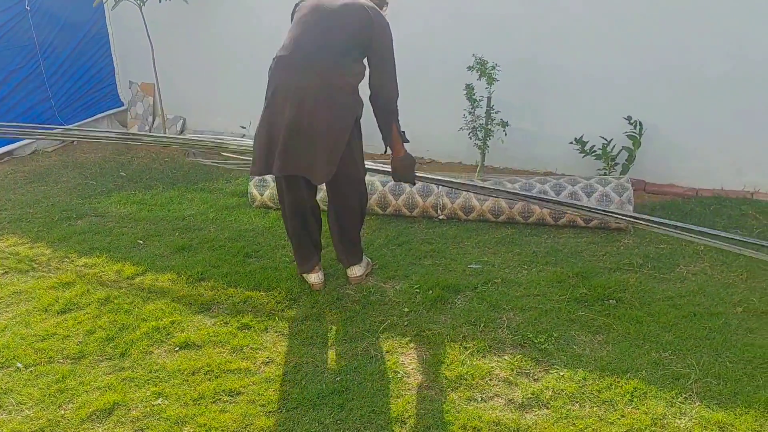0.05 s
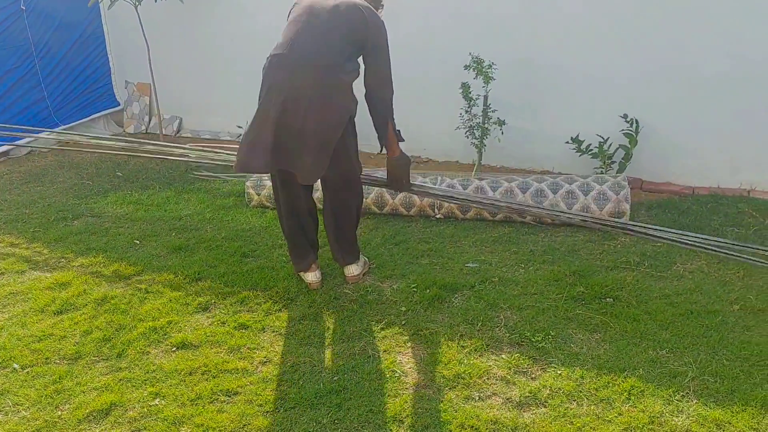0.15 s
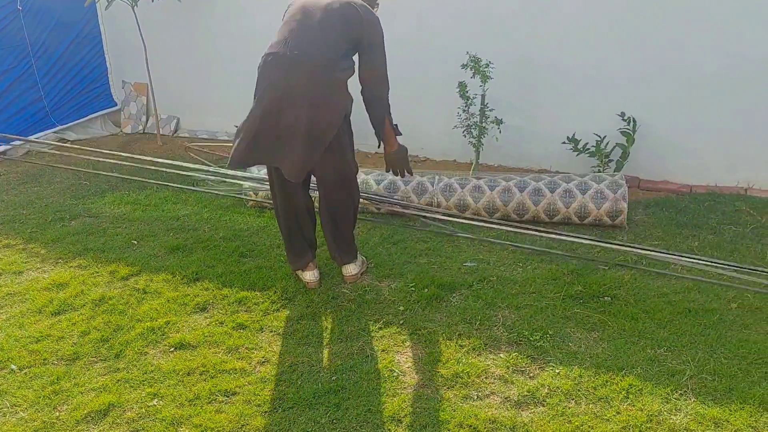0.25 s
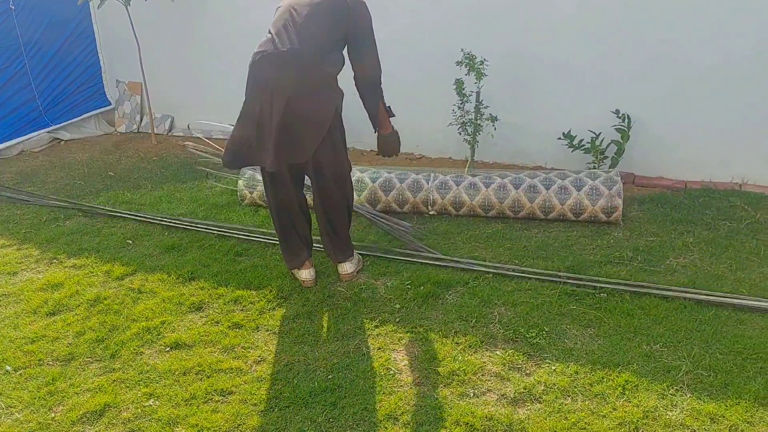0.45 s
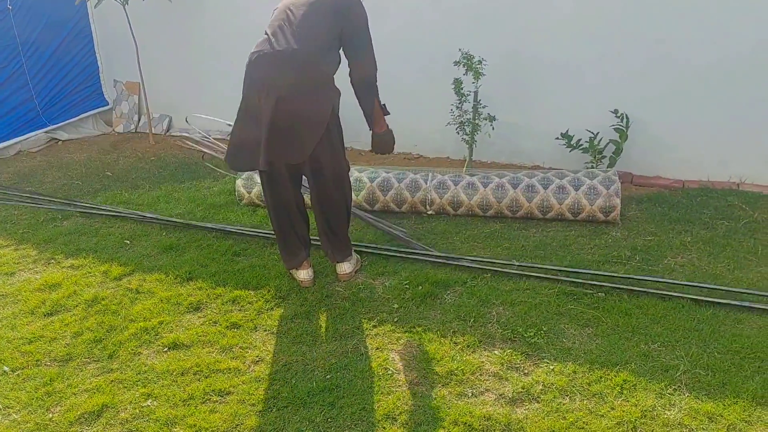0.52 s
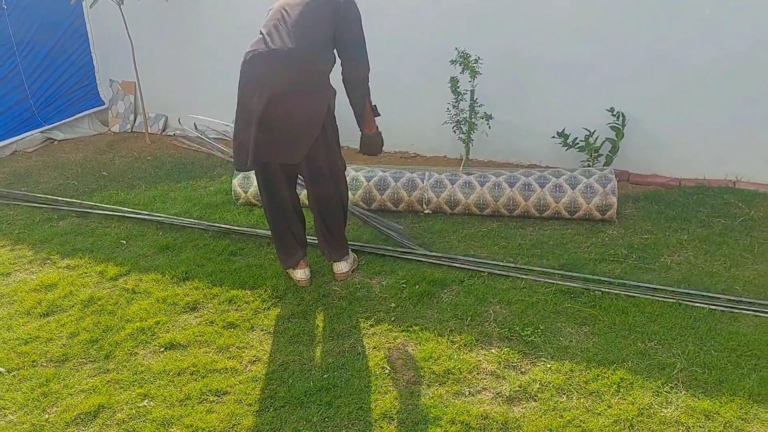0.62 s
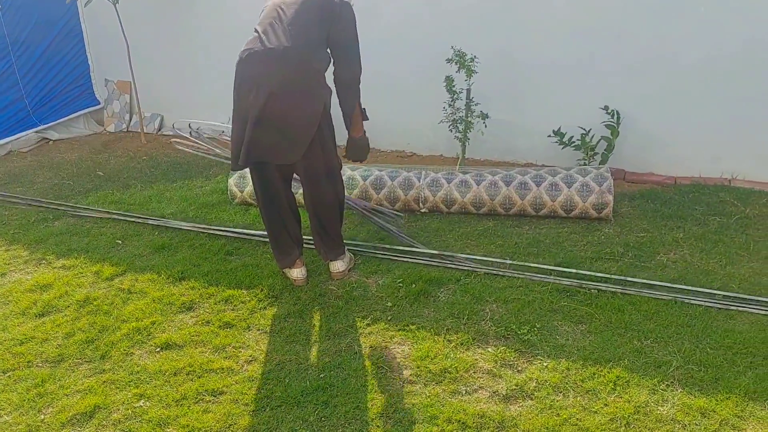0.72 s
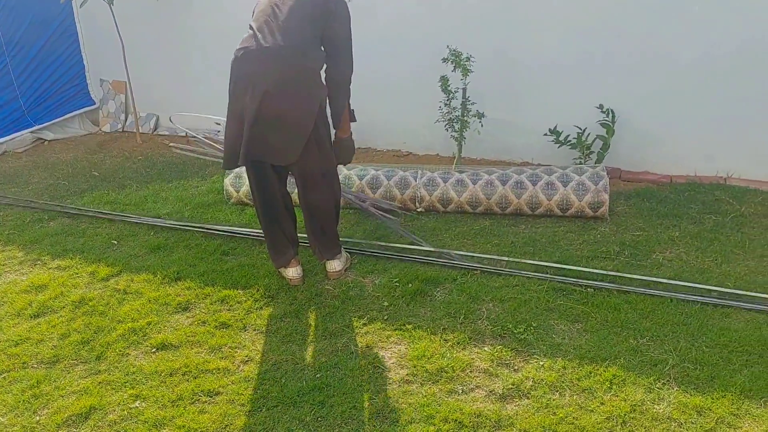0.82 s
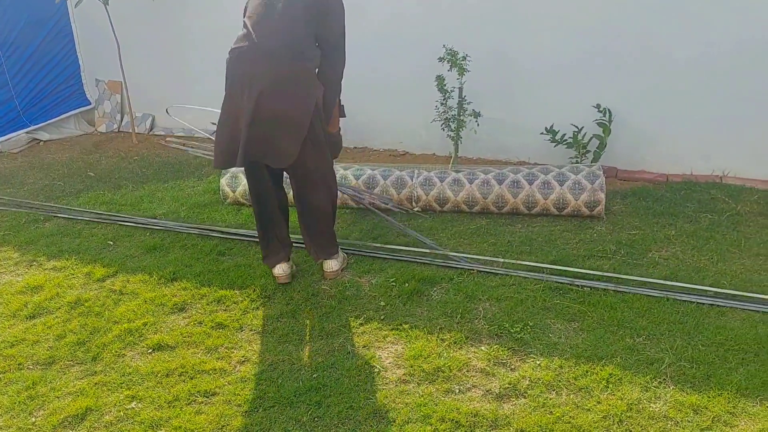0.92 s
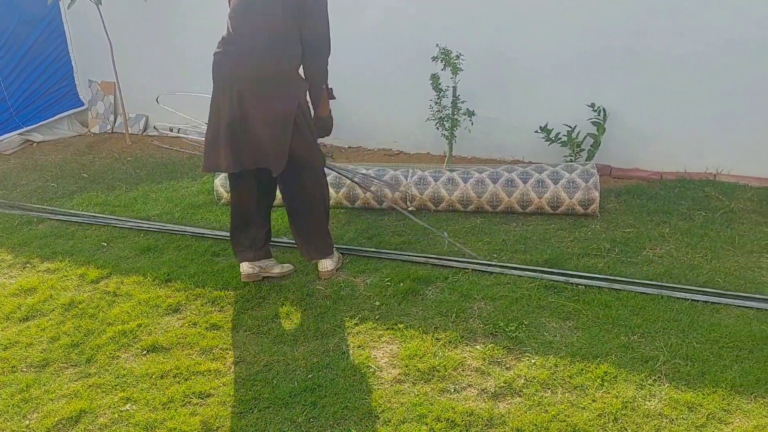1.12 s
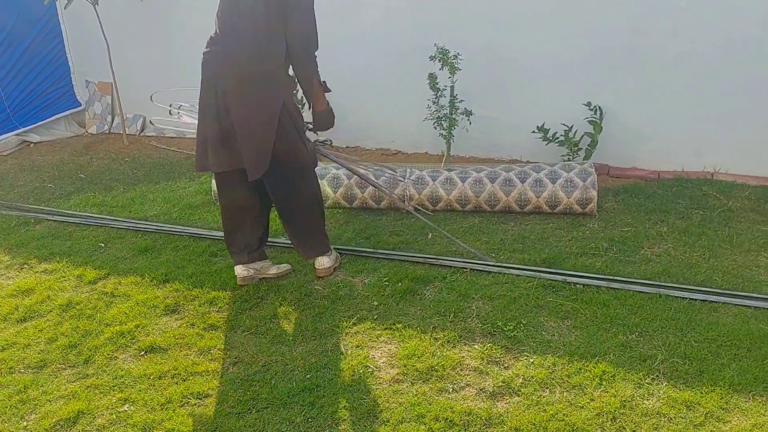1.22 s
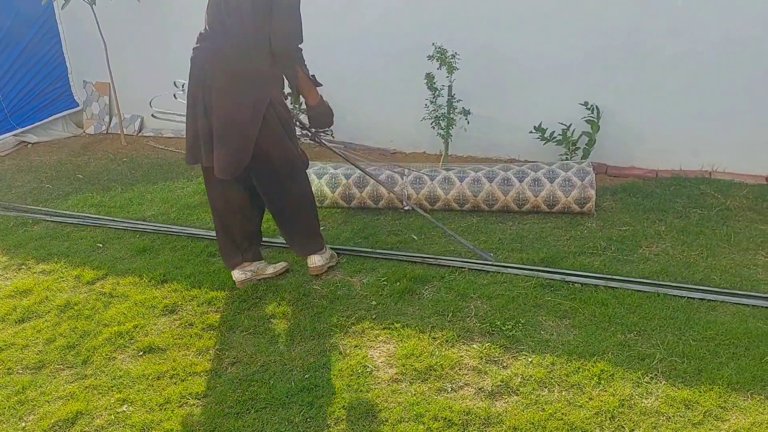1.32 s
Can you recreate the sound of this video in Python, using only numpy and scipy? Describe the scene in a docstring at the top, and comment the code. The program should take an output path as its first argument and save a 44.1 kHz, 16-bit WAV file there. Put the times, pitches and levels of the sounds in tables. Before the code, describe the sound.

A bundle of long, thin metal rods clatters and jangles as it falls, landing on a lawn with soft thuds. Dull hollow knocks and a brief sliding hiss follow as the rattle dies, over faint outdoor wind.

```python
"""A light metallic rattle over faint wind and a low hum: a bundle of long, thin rods is let go over a lawn. The
rods clash harder as they fall; every contact ticks, clanks, jangles and feeds their dense bending modes. They
land with soft thuds, a puff of wind bumps the left side, and dull hollow knocks follow. A rod slides with a
bright hiss during the fall, and over the pile near the end. The tube walls ring on in a dense, diffuse tail."""
import sys
import numpy as np
from scipy import signal
from scipy.fft import rfft, irfft, next_fast_len
from scipy.io import wavfile
from scipy.ndimage import uniform_filter1d

SR = 44100
rng = np.random.default_rng(int(sys.argv[2]) if len(sys.argv) > 2 else 0)


def materialize(psi):
    """Save the field psi as 16-bit PCM at rate SR to the path in sys.argv[1].

    A 1-D psi becomes a single channel; in a 2-D psi each row is a channel.
    """
    bounded = np.clip(np.atleast_2d(psi).T, -1, 1)
    quanta = np.round(bounded * 32767).astype(np.int16)
    wavfile.write(sys.argv[1], SR, quanta)


N = 59535

# rod clashes, each starting a dying rattle: t/s, level/dB, t60/s, brightness/dB
CLASHES = [(-.04, -44.5, 0.71, -30), (.025, -42.5, .5, -3.5), (0.051, -45.5, 3.6, 8.5),
           (0.175, -33, 1.8, 6.5), (0.251, -20.5, 0.57, 7.5), (.275, -24.5, 0.19, 2), (0.356, -22, 0.33, 6),
           (0.386, -17.5, .45, 8), (.424, -27, 0.72, 16), (0.464, -28, 0.5, 20), (0.498, -21, 0.64, 9.5),
           (0.531, -20.5, 0.097, 14), (0.547, -13, 0.17, -4), (0.653, -21, 0.37, -2.5),
           (.694, -26.5, 0.36, 9), (0.743, -26.5, 0.52, 1.5), (0.856, -32.5, .2, 1.5),
           (0.904, -30, .15, -4), (.99, -46, 0.87, -6), (1.138, -41, 0.24, 5.5), (1.194, -54.5, 0.064, 15)]
# ring time of the bending modes: f/Hz, t60/s
BEND_DECAY = [(700, 0.58), (2000, 0.43), (5000, 0.23), (9000, 0.09), (15000, 0.13)]
# colours of the bending ring, the tube-wall clank and the contact tick: f/Hz, level/dB
BEND_EQ = [(150, -14), (350, -17.5), (650, -24), (900, -9), (1300, -3), (1900, -1), (2300, 0.5),
           (3200, -1.5), (4400, -2.5), (5100, -1.5), (5900, -10), (8000, -20.5), (15000, -20)]
CLANK_EQ = [(300, -38), (700, -32), (1900, -3), (3200, -6.5), (4400, 1), (5200, -3), (5900, -7.5),
            (7500, -23), (9500, -30), (15000, -12.5)]
TICK_EQ = [(500, -13.5), (3000, 4.5), (6500, 11.5), (8500, 4), (9600, -4.5), (11500, 8), (15000, 5.5)]
# jangling modes of the tube walls: f/Hz, level/dB
TUBE_MODES = [(4320, 0.5), (4560, -6), (4700, 2), (4950, 3), (5090, 6.5), (5165, 2), (5300, 1.5)]
# how alike the metal sounds left and right: f/Hz, correlation
STEREO_LIKENESS = [(300, 0.74), (700, 0.13), (1500, 0.94), (3200, 0.3), (4400, 0.52), (5200, 0.25),
                   (6500, 0.083), (15000, 0.054)]
# its balance, left over right: f/Hz, level/dB
STEREO_BALANCE = [(60, 0.5), (92, -6), (140, 6), (210, -9), (330, -1.5), (500, -2.5), (770, 1.0),
                  (1170, -2), (1790, -6.5), (2740, -4), (4190, -7), (6410, 2), (9810, 3.5), (15000, -7.5)]
# its lead on the left: f/Hz, phase/rad
STEREO_LEAD = [(300, 0), (700, 0), (1100, 3), (1800, 2), (2300, 7), (2800, 8.5), (4600, 10), (5200, 12),
               (6200, 13.5)]
# colour of the wind: f/Hz, level/dB
WIND_EQ = [(25, -21), (55, 4.5), (120, -8.5), (250, -5.5), (600, -21), (2000, -13), (6000, -28.5),
           (15000, -21)]
# partials of the hum: f/Hz, level/dB
HUM_PARTIALS = [(64.5, -56.5), (128, -63)]
# fader ride on wind and hum together: t/s, level/dB
BED_RIDE = [(0, 3.5), (.1, 5), (.17, 6), (.22, 7.5), (.3, 3.5), (.5, 0), (.66, -0.5), (1.1, -0.5),
            (1.35, -6.5)]
# colour of the lawn's rumble: f/Hz, level/dB
TURF_EQ = [(30, -2), (70, 11), (120, -1), (250, 6), (500, -9), (1000, -21), (4000, -72)]
# strokes of a sliding rod: t/s, level/dB, t60/s
SLIDES = [(.19, -31.5, 0.54), (1.112, -51.5, 0.27), (1.143, -30.5, .18), (1.19, -41, 0.082)]
# colour of their hiss: f/Hz, level/dB
SLIDE_EQ = [(1000, -22.5), (4000, -8.5), (7000, -15), (9500, -13.5), (12000, -3.5), (15000, -2.5)]
# rods landing on the lawn: t/s, level/dB, f/Hz
THUDS = [(0.309, -36, 115.6), (.362, -31, 113), (0.4, -30, 117), (.438, -28, 118), (.442, -26.5, 217),
         (0.449, -23.5, 121), (.493, -26.5, 133), (0.556, -31, 121), (.585, -30.5, 118)]
# dull hollow knocks: t/s, level/dB, hold/s, t60/s
KNOCKS = [(0.74, -33.5, 0.024, 0.085), (.792, -35.5, .13, 0.26), (0.993, -45.5, 0.034, 0.17),
          (1.203, -43.5, 0.017, 0.35)]
# modes of the hollow body, the first two beating: f/Hz, level/dB
HOLLOW_MODES = [(234.7, -3), (256.4, -3.5), (194.8, -14.5), (290, -16), (350.4, -19.5), (391, -18.5),
                (456, -20)]
# colour of its buzz: f/Hz, level/dB
BUZZ_EQ = [(100, -25), (250, 3.5), (380, -10.5), (550, -16.5), (750, -14.5), (1000, -14), (3000, -55)]

ROD_COUNT, SPOT_COUNT = 10, 2  # rods, and striking spots on each
TOP_HZ = 15550


def amp(db):
    """Decibels to gain."""
    return 10 ** (np.asarray(db) / 20)


def along(curve, hz):
    """Read a curve on a log frequency axis."""
    freqs, values = np.transpose(curve)
    return np.interp(np.log(hz + 1), np.log(freqs + 1), values)


def filtered(x, response):
    """Pass x through a complex frequency response."""
    size = next_fast_len(N + SR // 4)
    return irfft(rfft(x, size) * response(np.fft.rfftfreq(size, 1 / SR)), size)[..., :N]


def coloured(x, eq):
    """EQ that keeps the power of white noise."""
    def response(hz):
        gain = amp(along(eq, hz)) * (hz < TOP_HZ)
        return gain / np.sqrt(np.mean(gain ** 2) + 1e-20)
    return filtered(x, response)


def since(start):
    """Seconds since start, zero before."""
    return np.maximum(np.arange(N) / SR - start, 0)


def fade(t, t60):
    """Exponential decay, 60 dB down at t60."""
    return np.exp(-np.log(1000) * t / t60)


def swell(t, attack_s):
    """S-shaped fade-in."""
    return 1 - np.exp(-(t / attack_s) ** 2)


def excite(x, ring):
    """Play x through a two-channel ring scaled to unit energy."""
    ring = ring / np.linalg.norm(ring, axis=1, keepdims=True)
    return signal.fftconvolve(np.atleast_2d(x), ring, axes=1)[:, :N]


def noise_tail(x, t60):
    """Smear x with two unrelated tails of dying noise."""
    t = np.arange(SR // 3) / SR
    return excite(x, rng.standard_normal((2, len(t))) * fade(t, t60))


def rattle_envelope(brightness_share, attack_s=0.0043):
    """The dying rattles of all clashes add in power, each weighted by a share of its brightness."""
    power = np.zeros(N)
    for start, db, t60, brightness_db in CLASHES:
        t = since(start)
        gain = amp(db + brightness_share * brightness_db)
        power += (gain * (1 - np.exp(-t / attack_s)) * fade(t, t60)) ** 2
    return np.sqrt(power)


def contacts(per_s=900, spread_db=2, count=4000):
    """Rod meets rod in a stream of irregular taps of unit power, dealt out over rods and spots."""
    jitter, place = rng.random((count, 2)).T
    force = amp(spread_db * rng.standard_normal(count))
    force /= np.sqrt(np.abs(uniform_filter1d(force ** 2, size=24)))
    when = (np.arange(count) + 2 * jitter) / per_s
    heard = when < (N - 1) / SR
    taps = np.zeros((ROD_COUNT * SPOT_COUNT, N))
    taps[(place[heard] * len(taps)).astype(int), (when[heard] * SR).astype(int)] = force[heard]
    return taps.reshape(ROD_COUNT, SPOT_COUNT, N) * np.sqrt(SR / per_s)


def bending(taps, scale_hz=.965, shear_hz=90000, mismatch=0.0032, touch_hz=7.73):
    """One free rod rings: modes rise with the square of their number, weighted by the spot struck."""
    number = np.arange(10, 136) + .5
    ideal_hz = scale_hz * number ** 2 * (1 + mismatch * rng.standard_normal())
    hz = ideal_hz / np.sqrt(1 + ideal_hz / shear_hz)  # shear flattens the high modes
    hz += touch_hz * rng.standard_normal(len(number))  # touching rods detune each other
    t60 = along(BEND_DECAY, hz)
    t = np.arange(SR // 2) / SR
    modes = np.cos(2 * np.pi * hz[:, None] * t) * fade(t, t60[:, None])
    struck = np.cos(np.pi * number * rng.random((SPOT_COUNT, 1, 1)) + np.pi / 4)
    heard = np.cos(np.pi * number * rng.random((SPOT_COUNT, 2, 1)) + np.pi / 4)
    rings = (struck * heard * np.sqrt(number / t60)) @ modes
    return sum(excite(spot, ring) for spot, ring in zip(taps, rings))


def jangle(taps, t60=0.15, detune=.008):
    """One rod's tube wall rings, bright and short."""
    t = np.arange(SR // 3) / SR
    ring = np.zeros((2, len(t)))
    for hz, db in TUBE_MODES:
        pitch = hz * (1 + detune * rng.standard_normal())
        ring += amp(db) * np.sin(2 * np.pi * (pitch * t + rng.random((2, 1))))
    return excite(taps, ring * fade(t, t60))


def rods():
    """Every contact ticks, clanks, jangles and feeds the long ring of its rod."""
    spot_taps = contacts()
    rod_taps = spot_taps.sum(axis=1)
    soft, medium, hard = rattle_envelope(0), rattle_envelope(0.54), rattle_envelope(0.93)
    ring = coloured(sum(bending(taps * soft) for taps in spot_taps), BEND_EQ)
    clank = coloured(sum(noise_tail(taps * medium, t60=0.034) for taps in rod_taps), CLANK_EQ)
    tick = coloured(sum(noise_tail(taps * hard, t60=0.024) for taps in rod_taps), TICK_EQ)
    drive = medium * (medium / amp(-16)) ** 0.38  # hard clashes jangle more than light ones
    jangles = sum(jangle(taps * drive) for taps in rod_taps)
    return amp(-0.5) * ring + amp(-3.5) * jangles + amp(-2) * clank + amp(-8) * tick


def stereo_image(pair):
    """Blend two unrelated signals into left and right, with width, balance and phase set by frequency."""
    def width(hz):
        angle = np.arccos(np.clip(along(STEREO_LIKENESS, hz), -1, 1)) / 2
        return np.array([np.cos(angle), np.sin(angle)])

    def pan(hz):
        half = np.array([[.5], [-.5]])
        return amp(half * along(STEREO_BALANCE, hz)) * np.exp(1j * half * along(STEREO_LEAD, hz))

    mid, side = filtered(pair, width)
    return filtered(np.array([mid + side, mid - side]), pan)


def wind_and_hum():
    """A bed of faint wind and low hum that lifts early, then sinks away."""
    t = since(0)
    noise = coloured(rng.standard_normal((3, N)), WIND_EQ)
    wind = amp(-54) * (noise[0] + .5 * noise[1:])  # centre plus a little width
    hum = sum(amp(db) * np.sin(2 * np.pi * (hz * t + rng.random())) for hz, db in HUM_PARTIALS)
    ride = amp(np.interp(t, *np.transpose(BED_RIDE)))
    return ride * (np.sqrt(2) * hum + wind)


def turf_rumble():
    """The lawn rumbles under the rattle of the rods."""
    noise = coloured(rng.standard_normal((3, N)), TURF_EQ)
    return rattle_envelope(0) * (noise[0] + 0.22 * noise[1:])


def tube_wall_tail(metal, delay_s=.018, t60=0.36):
    """The tube walls ring on after the metal: a short, diffuse tail that sets in a moment late."""
    return filtered(noise_tail(metal, t60), lambda hz: np.exp(-2j * np.pi * hz * delay_s))


def slides(attack_s=.007):
    """Metal slides on metal: a short, bright hiss whose friction also bows the rod."""
    envelope = sum(amp(db) * swell(since(start), attack_s) * fade(since(start), t60)
                   for start, db, t60 in SLIDES)
    bowed = coloured(bending(envelope * rng.standard_normal((SPOT_COUNT, N))), BEND_EQ)
    hiss = envelope * coloured(rng.standard_normal((2, N)), SLIDE_EQ)
    return hiss + amp(-22) * bowed


def thuds(t60=0.062):
    """The lawn takes each landing rod with a low, damped tone."""
    return sum(amp(db) * np.sin(2 * np.pi * hz * since(start)) * fade(since(start), t60)
               for start, db, hz in THUDS)


def wind_puff(start=.4925, scale_s=0.0027):
    """A puff of wind bumps the left side: one quick pressure wobble, falling in pitch."""
    age = since(start) / scale_s
    return np.outer([1, 0], np.sin(2 * np.pi * np.log1p(age)) * np.exp(-age / 3))


def knocks(attack_s=0.0087, in_phase_s=.013):
    """Something hollow is knocked into a dull buzz: it swells, holds and dies as two close modes beat."""
    out = np.zeros(N)
    for start, db, hold, t60 in KNOCKS:
        t = since(start)
        ring = sum(amp(level) * np.cos(2 * np.pi * hz * (t - in_phase_s)) for hz, level in HOLLOW_MODES)
        buzz = amp(-9) * coloured(rng.standard_normal(N), BUZZ_EQ)
        envelope = swell(t, attack_s) * fade(since(start + hold), t60)
        out += amp(db) * (ring + buzz) * envelope
    return out


def scene():
    """The mix: metal up front, the diffuse ring of the tube walls behind it, and the low sounds underneath."""
    metal = stereo_image(rods() + slides())
    wall_ring = amp(-9) * tube_wall_tail(metal)
    lawn = amp(-27.5) * turf_rumble() + thuds()
    return metal + wall_ring + lawn + knocks() + wind_and_hum() + amp(-14.5) * wind_puff()


def record(dry, low_cut_hz=39, ceiling=.9):
    """Master chain: shed the deepest bass, round the highest peaks, cut the very top."""
    thinned = signal.sosfilt(signal.butter(4, low_cut_hz, "highpass", fs=SR, output="sos"), dry)
    rounded = thinned / (1 + np.abs(thinned / ceiling) ** 6) ** (1 / 6)
    return filtered(rounded, lambda hz: hz < TOP_HZ)


dry = scene()
out = record(dry)
materialize(out)
```